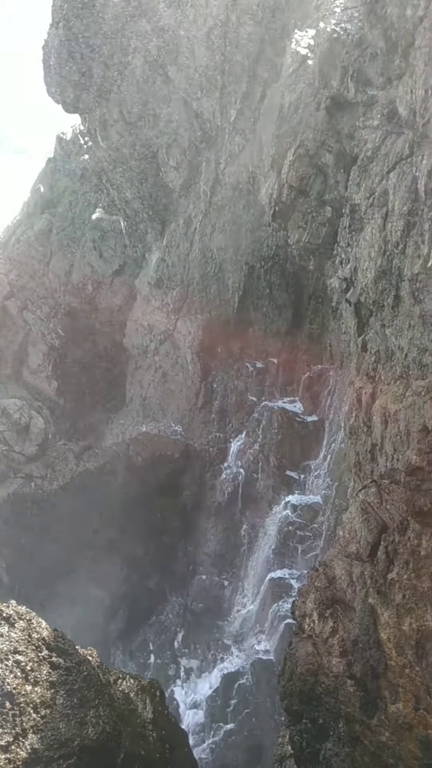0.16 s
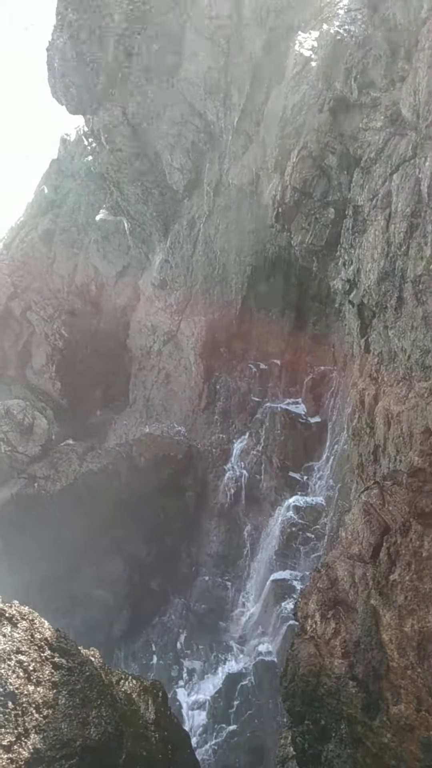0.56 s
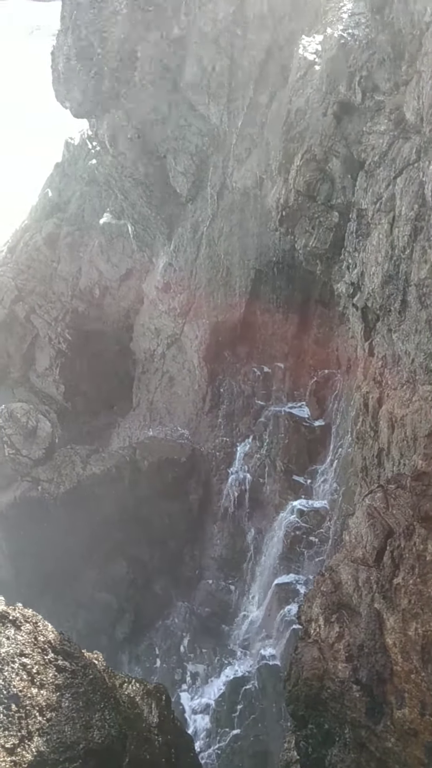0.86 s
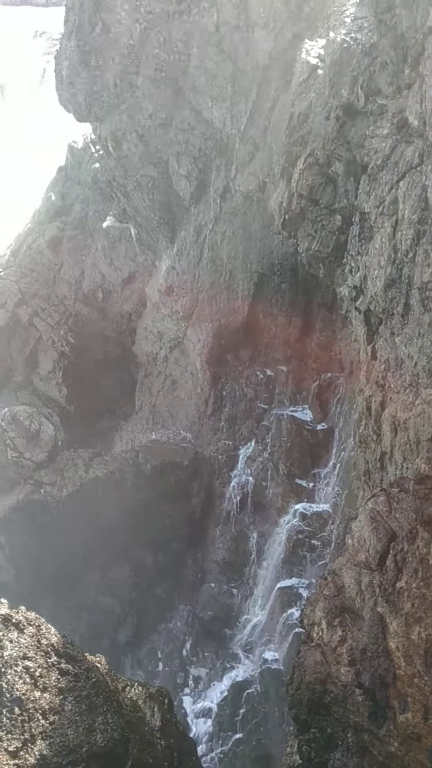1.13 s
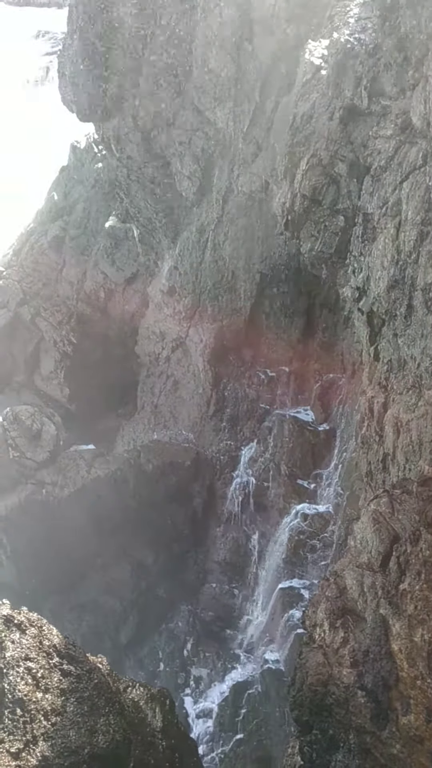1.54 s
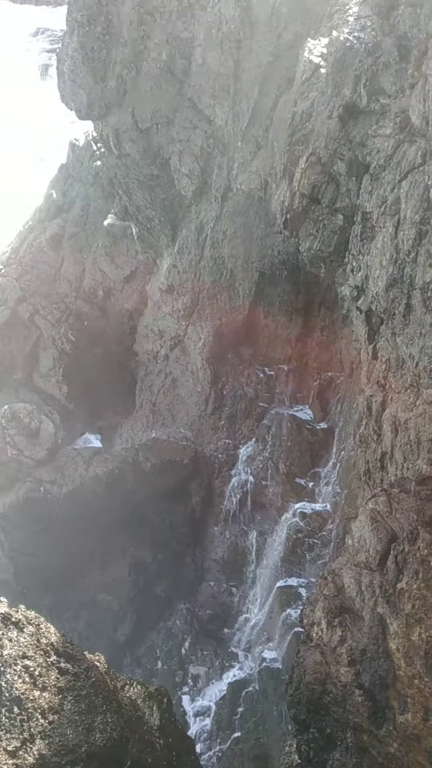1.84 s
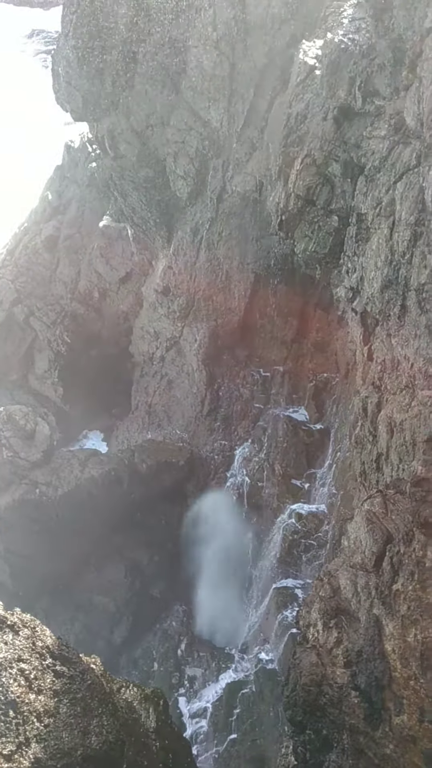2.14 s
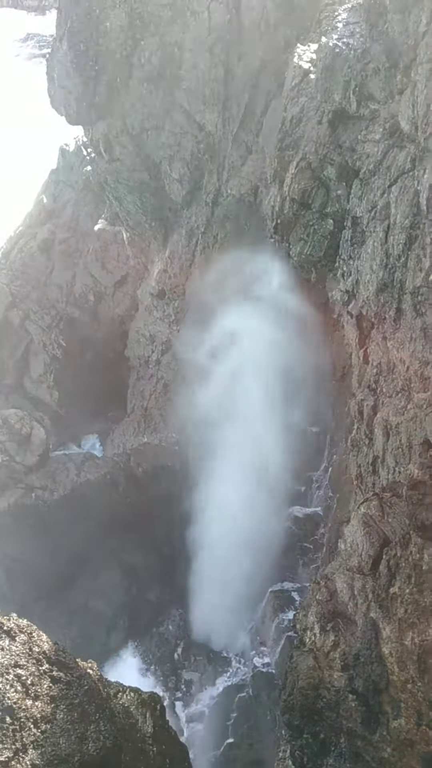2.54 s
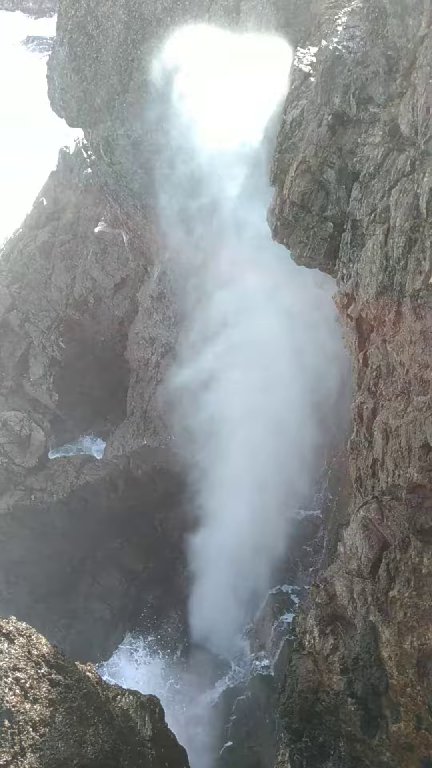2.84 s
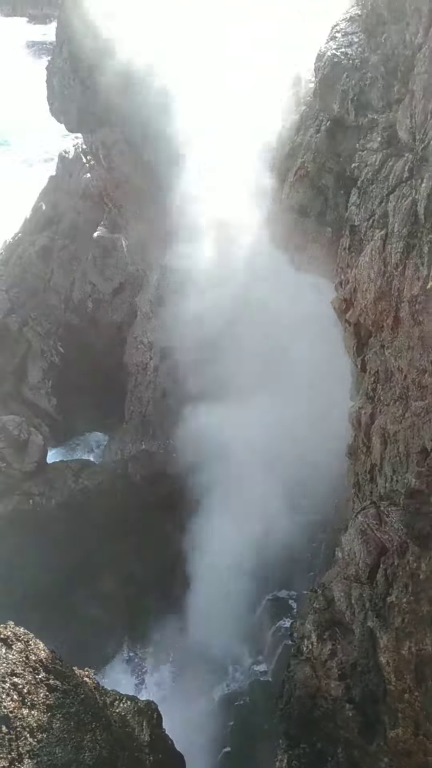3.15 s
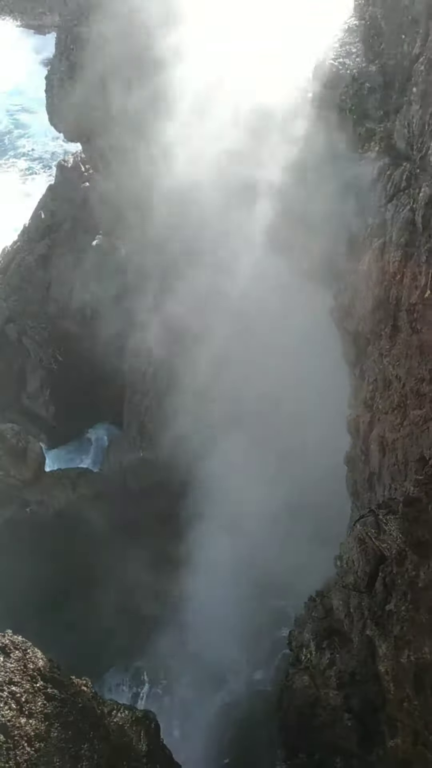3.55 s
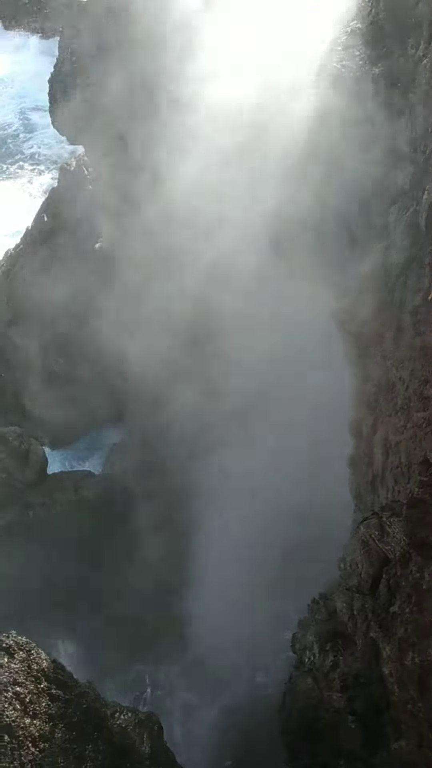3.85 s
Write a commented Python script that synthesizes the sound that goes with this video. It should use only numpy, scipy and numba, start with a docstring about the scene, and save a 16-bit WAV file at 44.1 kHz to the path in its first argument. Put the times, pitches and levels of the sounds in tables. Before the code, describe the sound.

Blowhole in a sea cliff roars up over quiet surf and trickling water, hissing with spray

```python
"""A blowhole in a sea cliff. At first surf rumbles (shaped noise) and water trickles down the rock
(noise with small ringing bubbles). After about two seconds a wave fills the cave below, which booms:
noise through a gliding filter. Air and water then roar up the cleft, ringing its resonances, and slugs
of water burst from its mouth with hissing spray and pattering drops. Two closely spaced microphone
ports hear the jet from slightly to the right and the cliff's echo from all round."""
import sys
import numpy as np
from scipy import signal
from scipy.fft import rfft, irfft
from scipy.io import wavfile
from scipy.ndimage import uniform_filter1d
from numba import njit

SR = 44100
rng = np.random.default_rng(int(sys.argv[2]) if len(sys.argv) > 2 else 0)


def store_wav(level_fs):
    """Save 16-bit WAV to argv[1]."""
    pcm = np.round(np.clip(np.atleast_2d(level_fs), -1, 1) * 32767)
    wavfile.write(sys.argv[1], SR, pcm.T.astype(np.int16))


N = 176400  # samples: four seconds

# In spectra, level_db is the relative level per Hz.
# air buffeting each port on its own: pitch_hz, level_db
BUFFET_SPECTRUM = [(20, -24), (45, -1), (70, -1), (110, -12), (200, -13), (600, -47)]
# surf spectrum: pitch_hz, level_db
SURF_SPECTRUM = [(20, -32), (40, -7), (65, -1), (100, 0), (155, -3.5), (205, -1.2), (270, -4), (340, -4),
                 (440, -11), (600, -8.5), (1000, -14.5), (2000, -22.5), (6000, -46)]
# surf strength: time_s, level_db
SURF_STRENGTH = [(0, -30.3), (.28, -30), (.5, -32.5), (.82, -31), (1.0, -30.5), (1.12, -30.3), (1.24, -32),
                 (1.38, -30), (1.6, -32), (2.0, -30), (4.0, -34)]
# running water spectrum: pitch_hz, level_db
TRICKLE_SPECTRUM = [(300, -6), (900, 1), (1900, 1.5), (2900, -2.2), (4500, -3.5), (7000, -8.5),
                    (10000, -13.5), (12500, -20), (14500, -20)]
# running water strength: time_s, level_db
TRICKLE_STRENGTH = [(0, -38), (.28, -37.5), (.6, -39), (1.05, -39.5), (1.6, -39), (2.0, -39), (4.0, -40)]
# boom of the air in the cave: time_s, level_db, pitch_hz
CAVE_BOOM = [(0, -38, 70.6), (.27, -33, 72.4), (.48, -51, 69), (1.9, -39.5, 66), (2.12, -31.5, 68),
             (2.2, -21.5, 72), (2.32, -24.5, 73), (2.43, -17, 73.5), (2.7, -17, 76), (3.0, -18, 76),
             (3.1, -20, 75.5), (3.22, -14.5, 80), (3.38, -22.5, 77.4), (3.6, -19.5, 83.5),
             (3.73, -14.5, 94), (3.83, -20, 83), (4.0, -21.5, 77.6)]
# strength of the jet: time_s, level_db
JET_STRENGTH = [(2.05, -36.5), (2.19, -31.5), (2.33, -23), (2.5, -23), (2.68, -18), (2.85, -18.5),
                (3.02, -14.5), (3.19, -15.5), (3.3, -15.5), (3.48, -14), (3.7, -20.5), (3.88, -15.5),
                (4.0, -19.5)]
# turbulence in the cleft: pitch_hz, level_db
RUMBLE_SPECTRUM = [(20, -30), (40, -17), (70, -5.5), (125, 2), (165, -0.1), (230, -1.5), (300, -3.5),
                   (350, -15.5), (480, -13), (800, -20.5), (1600, -45)]
# deep resonances of the cleft; reflections give each its own direction:
# pitch_hz, width_hz, level_db, left_port_lag_ms, relative_rise_per_s
CLEFT_RESONANCES = [(215.4, 37, -3.5, 0.18, 0.029), (291.2, 36.4, 1, 0.17, 0.089),
                    (393.5, 49, -5, 0.27, -0.019)]
# strength of the deep resonances: time_s, level_db
CLEFT_STRENGTH = [(2.05, -40.5), (2.2, -32.5), (2.35, -29), (2.42, -21.5), (2.55, -21), (2.74, -17),
                  (3.1, -19), (3.21, -19), (3.36, -17.5), (3.6, -19), (3.72, -23.5), (3.83, -17.5),
                  (4.0, -20.5)]
# resonances of the cleft's mouth: pitch_hz, width_hz, level_db, left_port_lag_ms, relative_rise_per_s
MOUTH_RESONANCES = [(553, 37, 0.5, .07, 0), (664, 56, 1, 0.035, 0.0018), (777, 50, -8, 0.12, 0.0037),
                    (864, 89, -5, 0.068, 0.01), (1159, 52, -10.5, 0.069, 0)]
# rush of water torn up in the jet: pitch_hz, level_db
RUSH_SPECTRUM = [(200, -1.5), (420, -5), (700, -4.5), (1000, -0.5), (1400, -5), (1900, -6.5), (3000, -13.5),
                 (5000, -21), (10000, -33)]
# strength of the rush, before the slugs add to it: time_s, level_db
RUSH_STRENGTH = [(2.0, -45), (2.25, -38), (2.47, -33.5), (2.6, -30), (2.9, -29), (3.08, -27.5), (3.2, -28),
                 (3.33, -27), (3.52, -26.5), (3.78, -27.5), (4.0, -25.5)]
# spray spectrum: pitch_hz, level_db
SPRAY_SPECTRUM = [(1000, 0.5), (2200, -1.5), (3500, -1.5), (5000, -2.5), (7000, -1.7), (9500, -5),
                  (12500, -10), (14500, -18)]
# strength of the spray, before the slugs add to it: time_s, level_db
SPRAY_STRENGTH = [(1.8, -45), (2.2, -41), (2.5, -39.5), (2.72, -39.7), (3.0, -39.5), (3.24, -37.5),
                  (3.29, -35.5), (3.55, -35.5), (3.8, -36.5), (4.0, -32)]
# slugs of water shot from the cleft: peak_s, extra_mouth_db, extra_rush_db, extra_spray_db
WATER_SLUGS = [(2.43, 3.5, 1, 1.5), (2.57, 8, 3, 2.3), (2.62, 0, 3.5, 1.3), (2.685, 2, 4.5, 2.8),
               (2.75, 2.5, 4.5, 4), (2.835, 6, 5.5, 3.3), (2.93, 4.5, 4.5, 2), (2.975, 0, 2.3, 2),
               (3.035, 5.5, 2, 3.2), (3.10, 6, 3.7, 4.2), (3.297, 5, 5, 4.2), (3.345, 1, 2, 2.3),
               (3.425, 3.5, 3.7, 3.6), (3.48, 2, 1.8, 1.5), (3.55, 1.5, 3.8, 2), (3.605, 2.5, 2.3, 3.7),
               (3.655, 0, 3, 1.4), (3.71, 1.5, 3.2, 3.6), (3.79, 1, 1.7, 3.3), (3.86, 4, 0, 2.6),
               (3.91, -1, 3.3, 1.6), (3.975, 2, 2.5, 2)]
# sound that arrives straight from the source; the highest treble is scattered: pitch_hz, level_db
DIRECT_COLOUR = [(1500, 0.5), (3200, 3.5), (6500, -1.5), (10000, -15)]
# in the bass both ports hear the same: pitch_hz, level_db
SHARED_BASS = [(200, 0)]
# colour of the right port: pitch_hz, level_db
RIGHT_PORT_COLOUR = [(500, 0.37), (800, -2), (1200, -1), (2000, -1.4), (3000, 0.5), (4200, 0), (5200, 1),
                     (6050, 3.5), (6900, 0), (8000, -3.5), (9000, -8.5), (10000, -19), (11500, -14),
                     (14000, -11)]

BREEZE_DB, BLAST_DB = -62, -19.5  # steady; relative to the jet
TRICKLE_ECHO_DB, RUMBLE_ECHO_DB, RUSH_ECHO_DB, SPRAY_ECHO_DB = 8.5, -4.5, -6, 2.5
BUBBLES_PER_S, BUBBLE_LOW_HZ, BUBBLE_HIGH_HZ = 900, 915, 6580
BUBBLE_CYCLES, BUBBLE_RISE, BUBBLE_DB = 17, 0.16, -8.5  # relative pitch rise over that many cycles
BOOM_WIDTH_HZ = 38
CLEFT_TUNED_S = 3.3  # the resonances glide through their listed pitch as water fills the cleft
RUMBLE_DB, MOUTH_DB = -2, -0.5
SLUG_WIDTH_S = .021
SPUTTER_PER_S, RUSH_SPUTTER_DB, SPRAY_SPUTTER_DB = 100, 1.35, 0.5
DROPS_PER_S, DROP_LOW_HZ, DROP_HIGH_HZ, DROP_CYCLES, DROP_DB = 1500, 2090, 12300, 2.7, -7
JET_LAG_MS, SPRAY_PAN_DB = 0.13, -4  # later on the left; left level relative to right
ROCK_ECHO_S, ROCK_DB = 0.00266, -19.5  # reflection from a near rock face
PORT_GAP_M, SOUND_M_S = 0.12, 343
LOW_CUT_HZ, TOP_HZ = 48, 14300
FADE_S = .004  # at the very end


def undb(db):
    """Turn decibels into gain."""
    return 10 ** (np.asarray(db) / 20)


def unit(x):
    """Scale to an average (rms) strength of 1."""
    return x / np.sqrt(np.mean(x ** 2))


def seconds():
    """Time of each sample."""
    return np.arange(N) / SR


def curve(table, axis=1):
    """Draw straight lines through one column of a time table, one value per sample."""
    rows = np.array(table, float)
    return np.interp(seconds(), rows[:, 0], rows[:, axis])


def bins():
    """Frequencies of the spectrum, in Hz."""
    return np.arange(N // 2 + 1) * SR / N


def colour(x, points):
    """Make each frequency louder or softer by following (pitch_hz, level_db) points."""
    hz, db = np.array(points, float).T
    gain = undb(np.interp(np.log(bins() + 1), np.log(hz), db))
    return irfft(rfft(x) * gain, N)


def walk(rate):
    """Smooth chance with spread 1, changing about rate times a second."""
    smoothing = 1 + (2 * bins() / rate) ** 2
    return unit(irfft(rfft(rng.standard_normal(N)) / smoothing, N))


@njit
def moving_bandpass(x, hz, width):
    """Let through a band around a moving centre, as a resonance does."""
    out, band, low = np.empty(len(x)), 0., 0.
    for i in range(len(x)):
        tuning, damping = np.tan(np.pi * hz[i] / SR), width / hz[i]
        middle = (band + tuning * (x[i] - low)) / (1 + tuning * (tuning + damping))
        band = 2 * middle - band
        low = low + 2 * tuning * middle
        out[i] = damping * middle
    return out


def driven(x, hold_s):
    """A resonance kept ringing by steady flow: its slow fades are evened out."""
    power = uniform_filter1d(x ** 2, int(hold_s * SR) + 1)
    return x / np.sqrt(power + 1e-18)


def diffuse():
    """Noise from all round at the two ports: alike in the bass, unrelated in the treble."""
    alike = np.sinc(2 * bins() * PORT_GAP_M / SOUND_M_S)
    shares = np.sqrt([1 + alike, 1 - alike])
    mid, side = irfft(rfft(rng.standard_normal((2, N))) * shares, N)
    return unit(np.array([mid + side, mid - side]))


def from_right(x, lag_ms):
    """Sound from the right reaches the left port a little later."""
    delay = np.exp(-2j * np.pi * bins() * lag_ms * 1e-3)
    return np.array([irfft(rfft(x) * delay, N), x])


def cliff_noise(spectrum, echo_db):
    """Noise of rough flow, heard directly, mirrored by a near rock face and scattered off the cliff."""
    source = rng.standard_normal(N)
    mirrored = undb(ROCK_DB) * np.roll(source, int(ROCK_ECHO_S * SR))
    direct = from_right(colour(source + mirrored, DIRECT_COLOUR), JET_LAG_MS)
    return unit(colour(direct + undb(echo_db) * diffuse(), spectrum))


def resonances(table):
    """Flow keeps a set of resonances ringing; they wander and glide as the water shifts."""
    ring = 0
    for hz, width, db, lag_ms, rise in table:
        glide = np.exp(rise * (seconds() - CLEFT_TUNED_S))
        centre = hz * glide * (1 + 0.019 * walk(7))
        once = moving_bandpass(rng.standard_normal(N), centre, float(width))
        twice = moving_bandpass(once, centre, 2. * width)
        ring = ring + undb(db) * from_right(driven(twice, hold_s=0.15), lag_ms)
    return unit(ring)


def grains(rate, low_hz, high_hz, cycles, rise, spread_db):
    """Bubbles or drops: short fading rings of random pitch, size and direction, rising if rise is above 0."""
    out = np.zeros((2, N))
    for when, pitch, size, where in rng.random((int(rate * N / SR), 4)):
        hz, start = low_hz * (high_hz / low_hz) ** pitch, int(when * N)
        lag = np.array([[1], [-1]]) * (where - .5) * PORT_GAP_M / SOUND_M_S
        length = min(int(2 * cycles / hz * SR) + 20, N - start)
        # age 1 is when the given number of cycles has passed
        age = np.maximum(np.arange(length) / SR - lag - abs(lag), 0) * hz / cycles
        ring = np.exp(-np.pi * age) * np.sin(2 * np.pi * cycles * age * (1 + rise * age / 2))
        out[:, start:start + length] += ring * undb(-spread_db * np.log(1 - size))
    return unit(out)


def buffet():
    """The breeze and the draught of the jet brush each port separately."""
    air = unit(colour(rng.standard_normal((2, N)), BUFFET_SPECTRUM))
    return air * (undb(BREEZE_DB) + undb(curve(JET_STRENGTH) + BLAST_DB))


def surf():
    """Waves churn round the foot of the cliff: noise from all round, gently swaying in level."""
    waves = unit(colour(diffuse(), SURF_SPECTRUM))
    return waves * undb(curve(SURF_STRENGTH) + 1.1 * walk(13))


def trickle():
    """Water runs down the rock: a wash of splashes with small ringing bubbles in it."""
    bubbles = grains(BUBBLES_PER_S, BUBBLE_LOW_HZ, BUBBLE_HIGH_HZ, BUBBLE_CYCLES, BUBBLE_RISE, spread_db=2.5)
    bubbles = unit(colour(bubbles, TRICKLE_SPECTRUM))
    wash = cliff_noise(TRICKLE_SPECTRUM, TRICKLE_ECHO_DB) * undb(0.36 * walk(25))
    return (wash + undb(BUBBLE_DB) * bubbles) * undb(curve(TRICKLE_STRENGTH))


def cave():
    """Trapped air booms, broadly rising in pitch as the wave shrinks the cavity."""
    hz, width = curve(CAVE_BOOM, axis=2), float(BOOM_WIDTH_HZ)
    once = moving_bandpass(rng.standard_normal(N), hz, width)
    air = moving_bandpass(once, hz, width)
    return from_right(driven(air, hold_s=0.043), JET_LAG_MS) * undb(curve(CAVE_BOOM))


def cleft():
    """The jet rumbles through the cleft and rings its deep resonances."""
    rumble = cliff_noise(RUMBLE_SPECTRUM, RUMBLE_ECHO_DB) * undb(curve(JET_STRENGTH) + RUMBLE_DB)
    ring = resonances(CLEFT_RESONANCES) * undb(curve(CLEFT_STRENGTH))
    return rumble + ring


def spout():
    """Slugs of water ring the mouth and tear apart in sputtering bursts; spray hisses and drops patter."""
    when, mouth_db, rush_db, spray_db = np.array(WATER_SLUGS).T
    # each slug is a smooth hump in time
    slugs = np.exp(-((seconds()[:, None] - when) / SLUG_WIDTH_S) ** 2)
    sputter = walk(SPUTTER_PER_S)

    mouth_level = curve(RUSH_STRENGTH) + MOUTH_DB + slugs @ mouth_db
    mouth = resonances(MOUTH_RESONANCES) * undb(mouth_level)

    rush_level = curve(RUSH_STRENGTH) + slugs @ rush_db + RUSH_SPUTTER_DB * sputter
    rush = cliff_noise(RUSH_SPECTRUM, RUSH_ECHO_DB) * undb(rush_level)

    mist = cliff_noise(SPRAY_SPECTRUM, SPRAY_ECHO_DB)
    drops = grains(DROPS_PER_S, DROP_LOW_HZ, DROP_HIGH_HZ, DROP_CYCLES, rise=0, spread_db=1.5)
    drops = unit(colour(drops, SPRAY_SPECTRUM))
    spray_level = curve(SPRAY_STRENGTH) + slugs @ spray_db + SPRAY_SPUTTER_DB * sputter
    spray = (mist + undb(DROP_DB) * drops) * undb(spray_level)
    pan = undb(np.array([[1], [-1]]) * SPRAY_PAN_DB / 2)
    return mouth + rush + spray * pan


def scene():
    """Air, surf and trickle throughout; cave, cleft and spout swell when the wave arrives."""
    return buffet() + surf() + trickle() + cave() + cleft() + spout()


def record(dry):
    """The right port has a treble resonance and a dull top; both lose the deepest bass and the highest treble."""
    heard = np.array([dry[0], colour(dry[1], SHARED_BASS + RIGHT_PORT_COLOUR)])
    low_cut = signal.butter(N=2, Wn=LOW_CUT_HZ, btype="high", fs=SR, output="sos")
    heard = signal.sosfilt(low_cut, heard)
    heard = heard * np.minimum(seconds()[::-1] / FADE_S, 1)
    # a very steep cut: 0.1 dB ripple below the top, 100 dB down above it
    top_cut = signal.ellip(16, .1, 100, TOP_HZ, fs=SR, output="sos")
    return signal.sosfilt(top_cut, heard)


dry = scene()
out = record(dry)
store_wav(out)
```